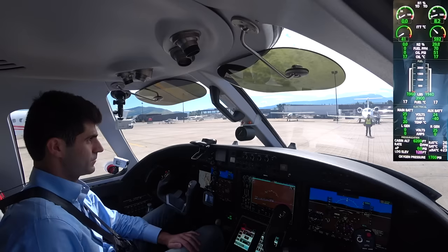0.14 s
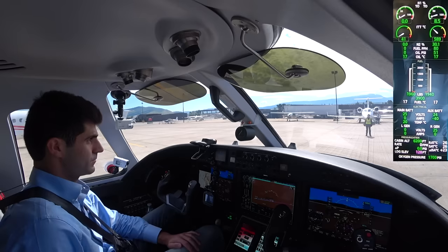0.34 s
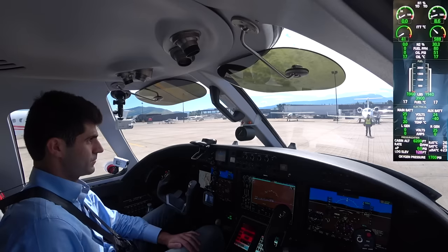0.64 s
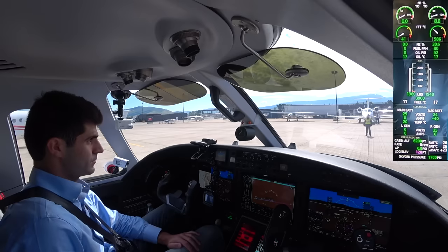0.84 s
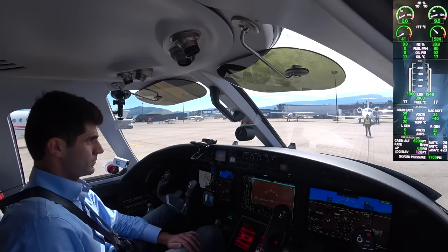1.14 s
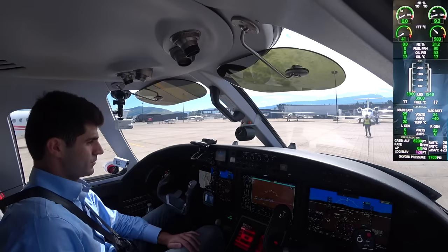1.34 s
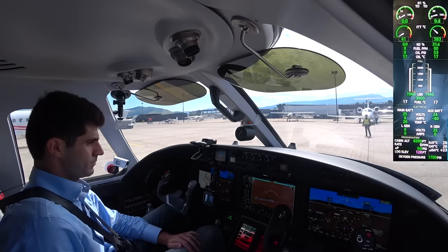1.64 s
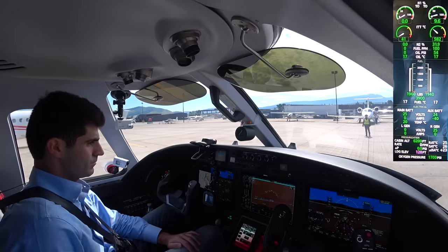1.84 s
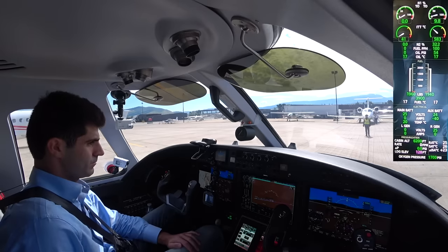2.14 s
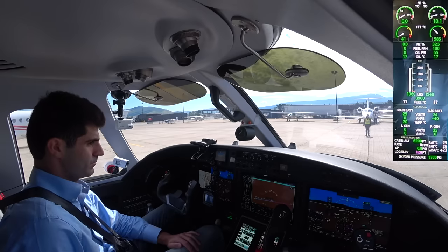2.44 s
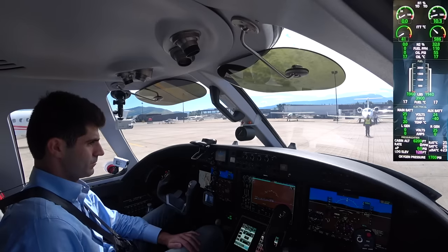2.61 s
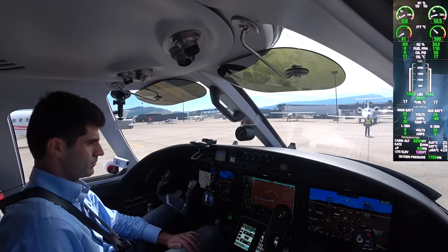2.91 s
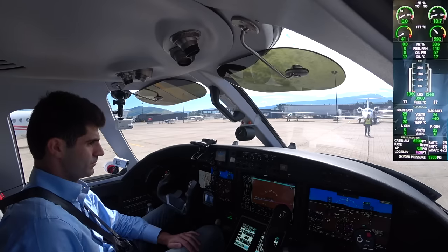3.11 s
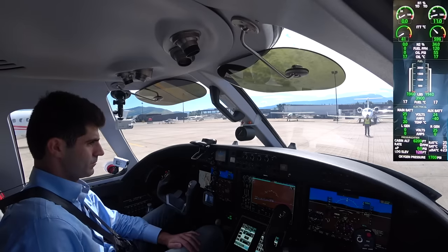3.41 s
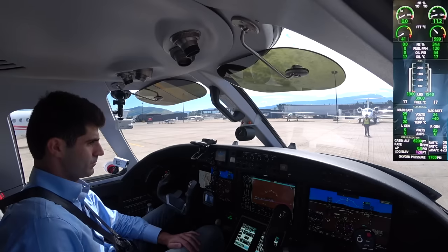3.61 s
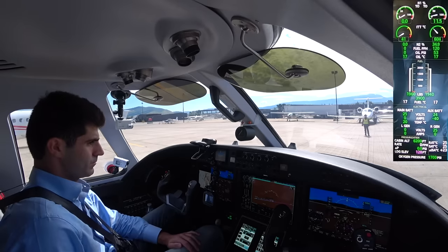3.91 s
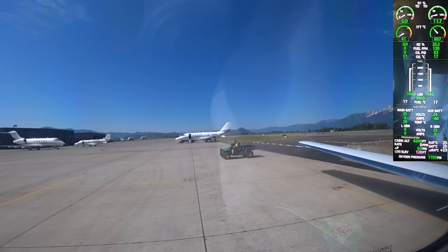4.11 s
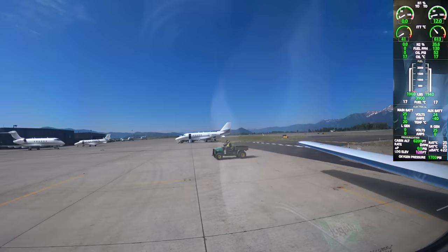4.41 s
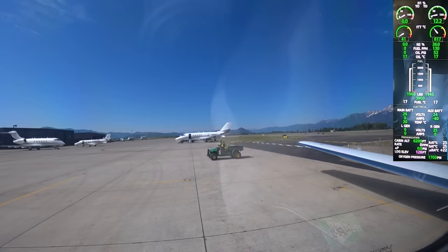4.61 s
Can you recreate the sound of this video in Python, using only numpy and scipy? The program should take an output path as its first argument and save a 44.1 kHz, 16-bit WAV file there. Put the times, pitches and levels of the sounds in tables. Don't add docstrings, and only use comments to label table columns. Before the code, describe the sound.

Inside a small jet's cockpit, vent air hisses steadily with faint cooling-fan tones. A turbofan is already burning: soft low roar and a wavering bass hum come in brief surges, growing fuller after three seconds, locking into a strong drone around three and a half, then slipping into short pulses. A faint high whine climbs smoothly throughout. Close stereo microphone in the cabin.

```python
import sys
import numpy as np
from scipy import signal
from scipy.fft import rfft, irfft, next_fast_len
from scipy.io import wavfile
from scipy.ndimage import map_coordinates

SR = 44100
rng = np.random.default_rng(int(sys.argv[2]) if len(sys.argv) > 2 else 0)


def master(y):
    cut = np.clip(np.atleast_2d(y).T, -1, 1)
    pcm = np.round(cut * 32767)
    wavfile.write(sys.argv[1], SR, pcm.astype(np.int16))


def linear_from_db(decibels):
    return 10 ** (np.asarray(decibels, float) / 20)


N = 209955


def clock():
    return np.arange(N) / SR


def along(points, hz):
    f, value = np.transpose(points)
    return np.interp(np.log(hz + 1), np.log(f + 1), value)


def curves(rows):
    s, *columns = np.transpose(rows)
    return [np.interp(clock(), s, column) for column in columns]


def wobble(rate):
    knots = rng.standard_normal(int(N * rate / SR) + 4)
    return map_coordinates(knots, [np.arange(N) * rate / SR])


def swells(rows, steady_db):
    t = np.arange(0, N + 64, 64) / SR
    top = sum(linear_from_db(db) * np.exp(-np.abs(2 * (t - s) / length) ** 3) for s, length, db in rows)
    return 20 * np.log10(linear_from_db(steady_db) + np.interp(clock(), t, top))


def filtered(x, response):
    m = next_fast_len(N + SR // 2)
    return irfft(rfft(x, m) * response(np.fft.rfftfreq(m, 1 / SR)), m)[..., :N]


def tone(turns, db, lean_db=0):
    wave = np.sin(2 * np.pi * (turns + rng.random()))
    return np.sqrt(2) * linear_from_db(db) * wave * linear_from_db([[lean_db / 2], [-lean_db / 2]])


# (frequency [Hz], likeness [0-1])
ALIKE = [(30, 0.92), (190, 0.99), (250, 0.62), (330, 1), (1100, 0.88), (1220, 0.82), (1440, 0.88),
         (1600, 0.38), (1900, .8), (2120, 0.54), (2300, 0.65), (3050, 0.54), (3300, 0.62), (10000, 0.78)]


def rush(gain):
    def colour(hz):
        turn = np.arccos(np.clip(along(ALIKE, hz), 0, 1)) / 2
        return gain(hz) * [np.ones_like(hz), np.tan(turn)]

    mid, side = filtered(rng.standard_normal((2, N)), colour)
    return np.array([mid + side, mid - side]) / np.std(mid)


# (frequency [Hz], level per Hz [dB])
AIR = [(120, -31), (200, -6), (284, -6), (309, -10.5), (353, -1.5), (592, -8), (699, -5), (854, -4.5),
       (1100, -4), (1560, -14), (5260, -30), (6870, -32.5), (10800, -39.5), (14000, -69.5), (22000, -120)]
# (frequency [Hz], width [Hz], level [dB])
COCKPIT = [(356, 42, 2), (412, 19, 0), (484, 13, 10), (500, 17, -8.5), (524, 29, 4.5), (650, 18, -0.5),
           (736, 28, -7.5), (730, 35, 3), (1121, 126, 3.5), (1173, 83, -7), (1330, 70, -1), (1449, 81, 7.5),
           (1543, 106, -4.5), (1770, 61, 3.5), (1977, 94, 4.5), (2090, 55, -5.5), (2370, 68, 4.5),
           (2480, 90, 2), (2750, 66, -4), (3120, 92, -3.5), (3240, 110, 6), (4350, 91, 5), (5570, 310, 2),
           (8900, 900, -2.5)]
AIR_DB = -35.5


def air():
    small_modes = rng.standard_normal(400)

    def colour(f):
        bumps = sum(db / (1 + (2 * (f - c) / w) ** 2) for c, w, db in COCKPIT)
        ripple = .9 * np.interp(f / 40, np.arange(400), small_modes) * np.clip(f / 2500 - .5, 0, 1)
        return linear_from_db(along(AIR, f) + bumps + ripple)

    return linear_from_db(AIR_DB + 0.37 * wobble(5.56)) * rush(colour)


# (frequency [Hz], rms level [dB], left over right beyond the ports' own balance [dB])
FANS = [(715, -52.5, 2), (811, -60, -0.5), (1020, -58.5, -3), (1227, -58.5, -10.5), (1445, -63, 2),
        (1640, -69, 6), (2143, -67, -7.5), (2862, -76, 3.5), (3994, -84, 4), (7405, -87, 3.5)]


def fans():
    t = clock()
    return sum(tone(hz * t + 0.27 * wobble(6), db + 3.1 * wobble(7), lean_db) for hz, db, lean_db in FANS)


# (time [s], roar level [dB])
BURN = [
    (0, -34),
    (.8, -33.5),
    (1.1, -29.5),
    (1.3, -33),
    (3.1, -29),
    (3.42, -29.5),
    (3.79, -32.5),
    (4.22, -28.5),
    (4.4, -30),
    (4.76, -31.5),
]
# (frequency [Hz], width [Hz], level [dB])
HULL = [(36, 26, -17), (59, 13, -14), (78.3, 23, -5.5), (101.7, 14, -5), (132.8, 33, -1),
        (160.1, 21.5, -0.5), (192.6, 11.4, -7.5), (234, 20, -17), (276.5, 21.5, -16.5), (350.6, 33, -16)]


def roar():
    def colour(f):
        modes = sum(linear_from_db(2 * db) / (1 + (2 * (f - c) / w) ** 4) for c, w, db in HULL)
        floor = linear_from_db(-37.5) / (1 + (f / 260) ** 6)
        return np.sqrt(modes + floor)

    return linear_from_db(curves(BURN)[0] + 3.0 + 0.8 * wobble(3.82)) * rush(colour)


# (time [s], frequency [Hz], level [dB])
ROTOR = [(0, 48.4, -45), (.4, 51.1, -42), (1, 53.2, -44), (1.4, 57.2, -35), (2.1, 60.7, -39),
         (2.4, 62.7, -39), (4.76, 70.8, -53)]
# (middle [s], length [s], level [dB])
SWAY_SWELLS = [
    (1.2, .2, -44),
    (1.9, 0.18, -35),
    (3.9, 0.27, -33),
    (4.55, 0.5, -40),
]
# (middle [s], length [s], level [dB])
CABIN_SWELLS = [
    (.7, 1.7, -41),
    (1.62, 0.26, -32.5),
    (2.62, 0.96, -35),
    (3.46, 0.36, -30),
    (4.04, .16, -32.5),
    (4.56, 0.19, -29),
]
SWAY_DB, CABIN_DB = -45, -46


def frame():
    t = clock()
    sway_db = swells(SWAY_SWELLS, SWAY_DB + 2.5 * wobble(4))
    cabin_db = swells(CABIN_SWELLS, CABIN_DB)
    rotor_hz, rotor_db = curves(ROTOR)
    sway = tone(22 * t + .2 * wobble(3), sway_db - 0.5 + 1.5 * wobble(11))
    cabin = tone(75.5 * t + 0.18 * wobble(7.7), cabin_db - 3.5 + 1.8 * wobble(9))
    rotor = tone(np.cumsum(rotor_hz) / SR, rotor_db)
    return sway + cabin + rotor


PATH_HZ = [6570, 6640, 6700, 6750, 6872, 6960, 7067, 7142, 7263, 7405, 7490, 7632, 7770, 8080]
PATH_WIDTH_HZ = [80, 55, 28, 40, 60, 80, 60, 35, 55, 75, 85, 75, 90, 100]
PATH_DB = [-66, -66, -63, -66, -63, -69, -64.5, -65, -62.5, -66, -66.5, -62.5, -70, -74]
PATH_LEAK_DB = -82
PATH_RIPPLE_DB, PATH_RIPPLE_HZ = 1.8, 14


def path(hz, ripple):
    f = np.arange(5500, 9500)
    resonances = zip(PATH_HZ, PATH_WIDTH_HZ, PATH_DB)
    gain = linear_from_db(PATH_LEAK_DB) + sum(linear_from_db(db) * np.exp(-(2 * (f - c) / w) ** 2) for c, w, db in resonances)
    small = np.interp(f / PATH_RIPPLE_HZ, np.arange(len(ripple)), ripple)
    return np.interp(hz, f, gain * linear_from_db(PATH_RIPPLE_DB * small))


# (time [s], frequency [Hz])
PITCH = [(0, 128), (.4, 125), (.9, 126), (1.5, 125), (1.9, 121), (2.3, 118), (2.55, 122), (2.8, 119),
         (3.1, 122.5), (3.3, 125), (3.5, 122), (3.75, 122), (3.88, 127), (4.1, 124), (4.4, 126),
         (4.55, 131), (4.76, 132.5)]


def hum_turns():
    return np.cumsum(curves(PITCH)[0] * (1 + 0.0085 * wobble(25))) / SR


# (time [s], frequency [Hz])
SPOOL = [(0, 6613), (.5, 6732), (1, 6863), (1.5, 7006), (2, 7159), (2.5, 7322), (3, 7493), (3.5, 7670),
         (4, 7849), (4.76, 8123)]
# (multiple of the blade tone [ratio], level [dB])
SHAFT = [(.4731, -74), (.75, -82), (1.25, -88)]
THROB_SIDE_DB, UPPER_FAN_DB, LOWER_FAN_DB, FAN_TILT_DB_PER_S = -10, -16.5, 0, 4.5


def whine(throb):
    hz, throb_hz = curves(SPOOL)[0], curves(PITCH)[0]
    turns = np.cumsum(hz + 3 * wobble(8)) / SR
    ripple = rng.standard_normal(size=800)
    blades = path(hz, ripple) * tone(turns, .7 * wobble(28))
    above = path(hz + throb_hz, ripple) * tone(turns + throb, THROB_SIDE_DB + 1.2 * wobble(9))
    below = path(hz - throb_hz, ripple) * tone(turns - throb, THROB_SIDE_DB - 8.5)
    tilt_db = FAN_TILT_DB_PER_S * np.minimum(clock(), 2.5)
    fan_sides = [(1.0688, UPPER_FAN_DB + tilt_db), (.9335, LOWER_FAN_DB - tilt_db)]
    fan = sum(path(k * hz, ripple) * tone(k * turns, db + 1.5 * wobble(10)) for k, db in fan_sides)
    shaft = sum(tone(k * turns, db + 2.5 * wobble(5)) for k, db in SHAFT)
    return blades + above + below + fan + shaft


# (middle [s], length [s], level [dB])
SURGES = [(.1, 0.077, -33), (.47, 0.32, -33.5), (.695, 0.076, -24), (.93, 0.064, -31), (1.09, 0.12, -28.5),
          (1.25, 0.1, -34.5), (1.415, 0.075, -28), (1.52, 0.067, -31), (1.74, 0.23, -39),
          (1.91, 0.13, -23.5), (2.32, 0.57, -28.5), (2.7, 0.18, -25.5), (2.87, 0.14, -30),
          (3.0, 0.077, -21), (3.12, 0.11, -19), (3.31, 0.096, -19), (3.44, 0.02, -25.5), (3.63, 0.054, -26),
          (3.97, 0.17, -25.5), (4.215, 0.046, -26.5), (4.305, 0.031, -22.5), (4.44, .12, -30.5),
          (4.575, 0.046, -18.5), (4.66, 0.056, -19.5)]
# (middle [s], length [s], second harmonic level [dB], third harmonic level [dB])
CRESTS = [(1.75, 0.15, -38, -58), (2.02, 0.34, -40, -51), (2.3, 0.23, -43, -38), (2.51, .14, -35, -39),
          (2.77, 0.18, -34.5, -49), (2.855, 0.055, -46, -33.5), (3.106, 0.33, -34.5, -45),
          (3.642, 0.31, -32.5, -39), (4.028, 0.13, -34.5, -33.5), (4.291, 0.3, -33.5, -33),
          (4.617, 0.18, -43.5, -41)]
LOCK_S, LOCK_RISE_S, LOCK_DB = 3.48, 0.042, -18.5
SLIP_S, SLIP_DB_PER_S = 4.44, 48
IDLE_HUM_DB, IDLE_DB_PER_S = -47, 3.5
OVERTONE_START_DB, OVERTONE_DB_PER_S = -57.5, 4


def hum(turns):
    t = clock()
    hold = linear_from_db(LOCK_DB - SLIP_DB_PER_S * np.clip(t - SLIP_S, 0, None))
    locked = hold / (1 + np.exp((LOCK_S - t) / LOCK_RISE_S))
    idle = linear_from_db(IDLE_HUM_DB + IDLE_DB_PER_S * t)
    first_db = swells(SURGES, 20 * np.log10(locked + idle))
    steady_db = OVERTONE_START_DB + OVERTONE_DB_PER_S * t
    second_db = swells([(s, length, db) for s, length, db, _ in CRESTS], steady_db)
    third_db = swells([(s, length, db) for s, length, _, db in CRESTS], steady_db - 4.5)
    first = tone(turns, first_db - .7 + 0.28 * wobble(35), lean_db=-1.0)
    second = tone(1.98 * turns + .08 * wobble(22), second_db - 1.5 + 1.6 * wobble(20), lean_db=-5)
    third = tone(2.96 * turns + .15 * wobble(22), third_db - 4.5 + 2.2 * wobble(20), lean_db=-1)
    fifth = tone(4.92 * turns + 0.2 * wobble(15), third_db - 14)
    return first + second + third + fifth


def scene():
    throb = hum_turns()
    return air() + fans() + roar() + frame() + whine(throb) + hum(throb)


# (frequency [Hz], left over right [dB])
LEAN = [(55, -.6), (89, -2.5), (130, -5), (200, 0), (290, 6), (430, 5.5), (650, 3.5), (960, 3.5),
        (1430, 0.0), (2120, -1.0), (3150, -2.5), (4680, -3.0), (6950, -4), (10300, -0.5)]
# (frequency [Hz], left leads by [rad])
LEAD = [(45, 0.03), (90, 0.1), (125, 0.67), (180, 1.32), (550, 1.43), (700, 1.22), (1200, 1.09),
        (2400, 0.7), (4000, 0.27), (8000, 0.66), (11000, 0.23)]


def ports(hz):
    half = along(LEAN, hz) / 2 * np.log(10) / 20 + .5j * along(LEAD, hz)
    return np.exp([half, -half]) / np.abs(np.cosh(half))


def top_cut(x):
    return signal.sosfilt(signal.butter(12, 11060, fs=SR, output="sos"), x)


def record(dry):
    fade = np.hanning(SR // 2)[SR // 4:]
    after = dry[:, :-len(fade) - 1:-1] * fade
    before = dry[:, len(fade):0:-1] * fade[::-1]
    gap = np.zeros((2, next_fast_len(N + SR // 2) - N - 2 * len(fade)))
    mix = filtered(np.hstack([dry, after, gap, before]), ports)
    return top_cut(mix)


dry = scene()
out = record(dry)
master(out)
```